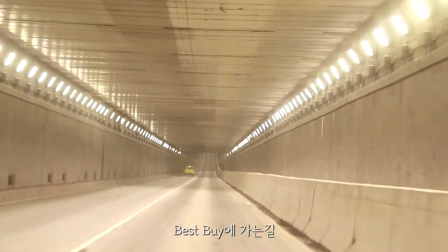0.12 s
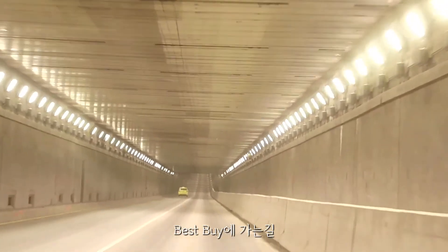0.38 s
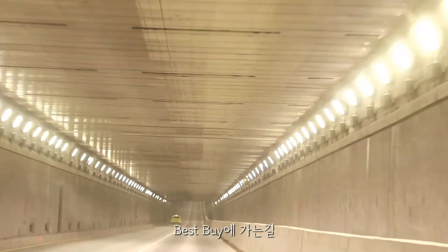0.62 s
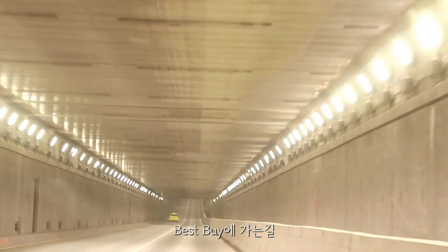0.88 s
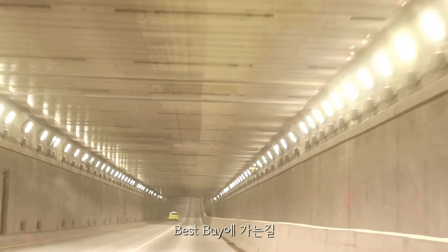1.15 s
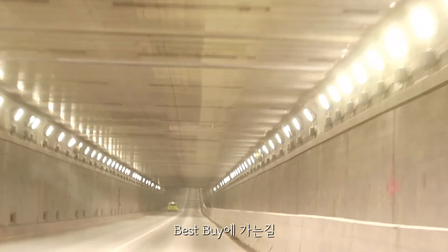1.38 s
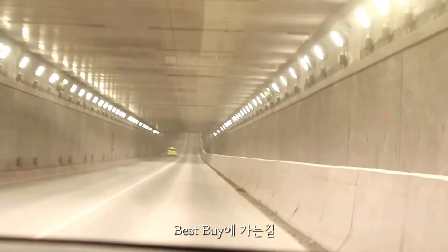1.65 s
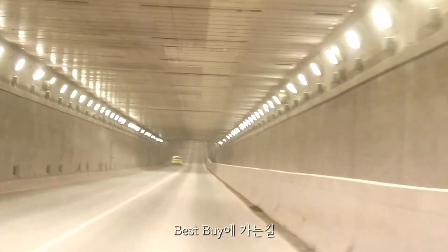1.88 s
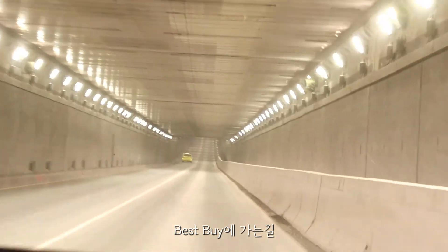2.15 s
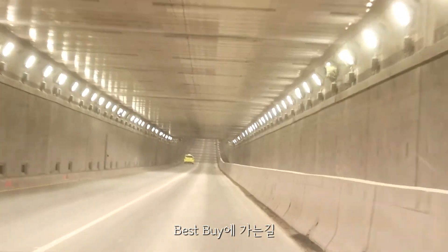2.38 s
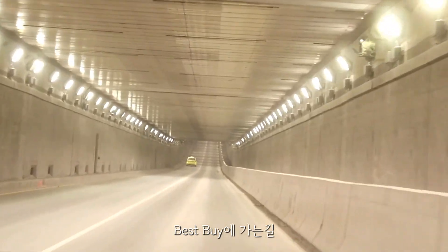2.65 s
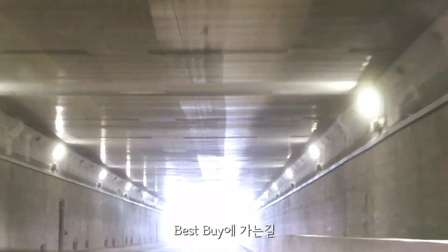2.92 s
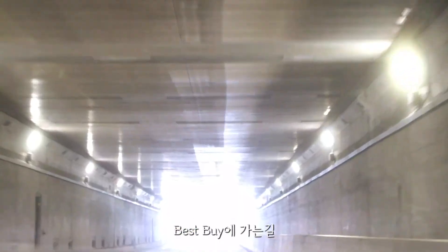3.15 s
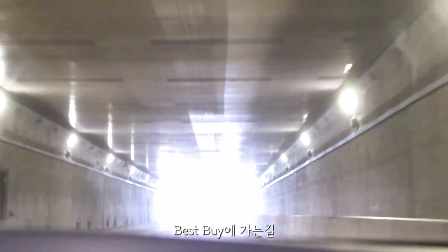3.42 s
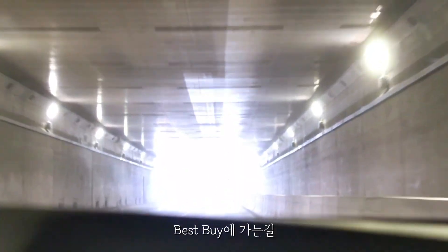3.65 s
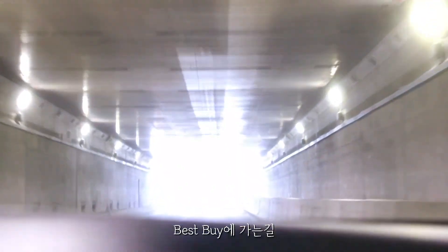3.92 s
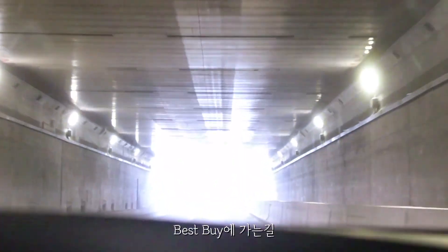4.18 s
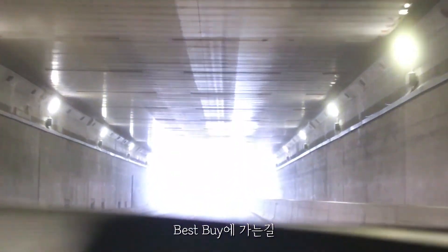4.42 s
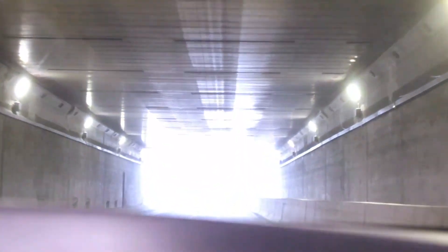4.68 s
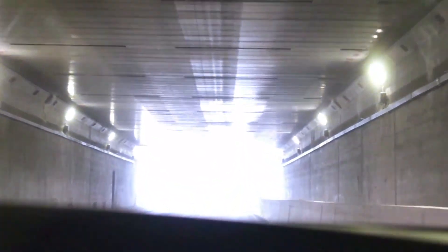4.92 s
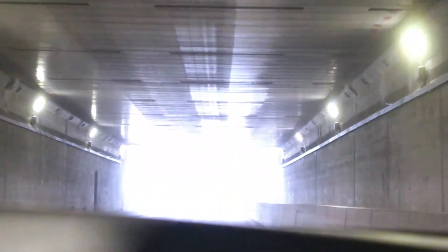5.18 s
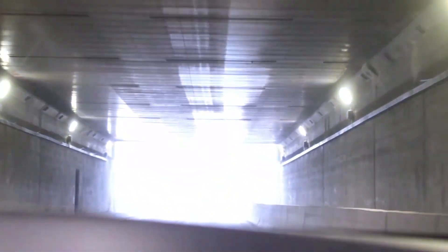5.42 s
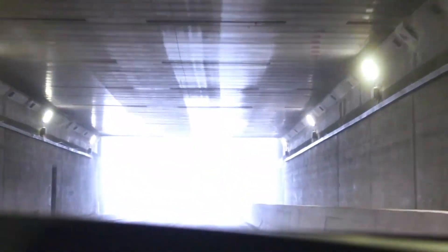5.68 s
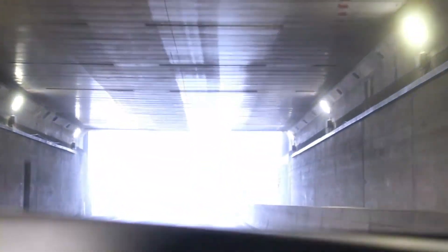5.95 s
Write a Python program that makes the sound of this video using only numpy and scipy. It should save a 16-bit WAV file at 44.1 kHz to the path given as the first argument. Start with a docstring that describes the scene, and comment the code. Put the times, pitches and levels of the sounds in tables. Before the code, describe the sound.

Heard from inside a car cabin in a road tunnel: deep tyre rumble, soft muffled tunnel roar and a faint engine hum. Close to the microphones a hand scuffs plastic, which snaps sharply once. Shortly after, a thin tick marks an abrupt cut to another stretch of road, where the engine's low note booms and slowly sinks in pitch over the rumble, with faint hiss throughout.

```python
"""Tyre rumble and tunnel roar fill a moving car's cabin, with a faint engine note: shaped noise and sines.
Near the close microphone pair a hand rubs plastic (grainy noise) and snaps it once (struck resonances).
At an abrupt edit with a thin tick, a second stretch of tunnel road fades in fast, without the hand.
There the engine's firing note booms in the cabin and its pitch sinks slowly. Faint hiss lies under all."""
import sys
import numpy as np
from scipy import signal
from scipy.io import wavfile
from scipy.ndimage import uniform_filter1d

SR = 44100
rng = np.random.default_rng(int(sys.argv[2]) if len(sys.argv) > 2 else 0)


def boost_factor(decibels):
    """Convert a level in decibels to a linear amplitude factor."""
    exponent = np.asarray(decibels, float) / 20
    return 10 ** exponent


def master_out(mix):
    """Clip the mix to full scale and print it as 16-bit PCM to the path in sys.argv[1]."""
    frames = np.transpose(np.atleast_2d(mix))
    ceiling = np.clip(frames, -1, 1)
    pcm = np.round(ceiling * 32767).astype(np.int16)
    wavfile.write(sys.argv[1], SR, pcm)


N = 267246  # samples
CUT_S = 2.9025  # where the two stretches of road meet


def evened(x):
    """Scales to rms 1."""
    return x / np.sqrt(np.mean(x ** 2) + 1e-20)


def read(points, hz):
    """Reads a spectrum on a log-frequency axis."""
    f, value = np.transpose(points)
    return np.interp(np.log(hz + 1), np.log(f + 1), value)


def follow(points):
    """Reads a level curve at every sample."""
    time, level = np.transpose(points)
    return np.interp(np.arange(N) / SR, time, level)


def bell(hz, centre, width):
    """Profile of one resonance: 1 at its centre, half of that at the edges of its width."""
    return 1 / (1 + ((hz - centre) / (width / 2)) ** 2)


# Stereo image of the close, widened pair: (frequency [Hz], side over mid [dB])
PAIR_WIDTH = [(60, -69.5), (140, -61), (220, -20.5), (500, -19.5), (900, -14.5), (1800, -8.5), (3000, -4),
              (4500, 1.5), (7000, 2), (10500, 5), (12000, -0.5), (14000, -1)]


def noise(colour_db, size, patchy_db, flicker_db, width=PAIR_WIDTH):
    """Mid and side noise from random short-time spectra, with drifting patches; mid has rms 1."""
    hop = size // 4
    hz = np.fft.rfftfreq(size, 1 / SR)
    frames = N // hop + 5
    mid_re, mid_im, side_re, side_im, patches = rng.standard_normal((frames, len(hz), 5)).T
    patches = uniform_filter1d(patches, size=size // 100, axis=0)  # across frequency
    patches = evened(uniform_filter1d(patches, size=4, axis=1))  # across time
    flicker = rng.standard_normal(frames)  # moves the whole spectrum at once
    gain = boost_factor(colour_db(hz)[:, None] + patchy_db * patches + flicker_db * flicker)
    mid = mid_re + 1j * mid_im
    side = (side_re + 1j * side_im) * boost_factor(read(width, hz))[:, None]
    spectra = np.array([mid, side]) * gain
    pair = signal.istft(spectra, nperseg=size, noverlap=size - hop)[1][:, :N]
    return pair / pair[0].std()


# Self-noise of the microphones, lifted by the widening: (frequency [Hz], relative density [dB per Hz])
HISS_COLOUR = [(1500, -20.5), (4000, -1.5), (7000, 0), (10500, -3), (12000, -7.5), (13500, -19.5),
               (16000, -41)]


def hiss():
    """Steady microphone self-noise, placed only in the side channel."""
    level_db = -77.5
    steady = noise(lambda hz: read(HISS_COLOUR, hz), size=1024, patchy_db=0.3, flicker_db=0.0)[0]
    return boost_factor(level_db) * steady * [[0], [1]]


# All around the microphones, the car body on its springs, one table a stretch:
# (frequency [Hz], width [Hz], relative level [dB])
SHUDDER_MODES = [
    [(33.4, 2.4, -7.5), (44.4, 8, -11.5)],
    [(31.6, 6, -7.5), (41.5, 5.5, 2.5)],
]
# Tyres under the floor, one table a stretch: (frequency [Hz], relative density [dB per Hz])
RUMBLE_COLOUR = [
    [(55, -13.5), (66, 0.5), (78, -0.5), (120, 1.5), (160, -7), (185, -6.5), (200, -36.5), (260, -32)],
    [(55, -3.5), (66, -3.5), (78, 0), (120, -3.5), (160, -5.5), (180, -10), (200, -19), (260, -34)],
]
# Tunnel outside the windows, one table a stretch: (frequency [Hz], relative density [dB per Hz])
ROAR_COLOUR = [
    [(150, -16.5), (200, -3.5), (330, -5.5), (480, -9.5), (700, -13.5), (850, -15.5), (950, -18.5),
     (1400, -21.5), (2000, -27.5), (2800, -35.5), (4000, -43.0), (5500, -51.0), (7500, -55.0),
     (10000, -58.5), (13000, -65.5), (15000, -88.5)],
    [(150, -19.5), (200, -5.0), (330, -7.0), (480, -11.5), (700, -10.5), (850, -17), (950, -17.0),
     (1400, -22.5), (2000, -26.5), (2800, -35.0), (4000, -43.0), (5500, -49.5), (7500, -56.5),
     (10000, -58.5), (13000, -60.5), (15000, -87.5)],
]
# Cabin and tyre resonances, one table a stretch: (frequency [Hz], width [Hz], lift [dB])
CABIN_MODES = [
    [(79, 7.6, 3.5), (116, 11, 0.5), (186, 6.7, 5), (340, 37, 1), (595, 36, 3.5), (764, 93, 5.5),
     (856, 20, 6)],
    [(99.6, 17, 3.5), (181.3, 8.7, 4), (343.6, 41, 4.5), (429, 2.8, 5.5), (604, 34, 2.5), (649, 17, 7),
     (694, 30, 2.5), (823, 36, 4), (6320, 360, 5.5)],
]
# Base levels at the pair, one row a stretch: (shudder [dB], rumble [dB], roar [dB])
ROAD_LEVELS = [(-31, -30.5, -38), (-36.5, -34, -43)]
# Coarseness of the road surface, one table a stretch: (time [s], level added to the rumble [dB])
SURFACE = [
    [(0, -1), (.8, 0.5), (1.3, 2), (2.8, -0.9)],
    [(2.9, 1.5), (3.4, 3.5), (3.7, -1.5), (4.5, -1.5), (4.9, 1), (6.06, -0.5)],
]
# How much of that coarseness the roar follows, one a stretch: (share [of the dB])
ROAR_SHARE = [0.22, 0.39]
# Long waves in the road heave the body, or a smooth part calms it:
# (centre time [s], level added to the shudder [dB], half length [s])
HEAVES = [(0.26, 9, .2), (0.832, -2, .2), (1.6, 1.5, 0.28), (4.152, 2.5, .3), (5.621, 6, 0.22)]


def road(k):
    """Body shudder on the springs, plus tyre rumble and tunnel roar that ring in the cabin, for stretch k."""
    def shudder_db(hz):
        bells = sum(boost_factor(db) * bell(hz, f, width) for f, width, db in SHUDDER_MODES[k])
        below = 30 * np.maximum(np.log2(24 / (hz + 1)), 0)
        return 20 * np.log10(bells) - below

    def cabin_db(hz):
        return sum(db * bell(hz, f, width) for f, width, db in CABIN_MODES[k])

    def rumble_db(hz):
        below = 30 * np.maximum(np.log2(55 / (hz + 1)), 0)
        above = 30 * np.maximum(np.log2((hz + 1) / 260), 0)
        return read(RUMBLE_COLOUR[k], hz) + cabin_db(hz) - below - above

    def roar_db(hz):
        return read(ROAR_COLOUR[k], hz) + cabin_db(hz)

    t = np.arange(N) / SR
    body_db, tyres_db, tunnel_db = ROAD_LEVELS[k]
    heave_db = sum(db * np.exp(-((t - s) / half) ** 2) for s, db, half in HEAVES)
    coarse_db = follow(SURFACE[k])
    shudder = noise(shudder_db, size=8192, patchy_db=1.5, flicker_db=1.14)
    rumble = noise(rumble_db, size=8192, patchy_db=0.4, flicker_db=0.2)
    roar = noise(roar_db, size=4096, patchy_db=0.84, flicker_db=0.83)
    shudder = boost_factor(body_db + heave_db) * shudder
    rumble = boost_factor(tyres_db + coarse_db) * rumble
    roar = boost_factor(tunnel_db + ROAR_SHARE[k] * coarse_db) * roar
    return shudder + rumble + roar


# Engine firing note, one row a stretch: (frequency as the stretch starts [Hz], sag [Hz per s])
FIRING_NOTE = [(80.3, 0.796), (70.43, 0.83)]
# Its level in the cabin, one table a stretch: (time [s], level of the fundamental, rms [dB])
BOOM = [
    [(0, -41.5), (2.9, -38.5)],
    [(2.92, -27.5), (3.3, -24), (4.15, -28), (4.95, -24.5), (5.55, -25.5), (6.06, -22)],
]
# Overtones of the firing note: (multiple, level re the fundamental [dB])
OVERTONES = [(2, -24), (3, -31), (5, -36.5)]


def engine(k):
    """A clean firing note with faint overtones, centred; it sags as the car slows."""
    start_hz, sag = FIRING_NOTE[k]
    since_start = np.arange(N) / SR - k * CUT_S
    phase = 2 * np.pi * np.cumsum(start_hz - sag * since_start) / SR
    note = np.sin(phase)
    for multiple, db in OVERTONES:
        note = note + boost_factor(db) * np.sin(multiple * phase + 2 * np.pi * rng.random())
    return np.sqrt(2) * boost_factor(follow(BOOM[k])) * note * [[1], [0]]  # mid only


# Dull slide of skin on plastic: (frequency [Hz], relative density [dB per Hz])
SLIDE_COLOUR = [(1200, -22), (2500, -6), (3500, -3.5), (5200, -2), (6500, -6), (8000, -12), (10500, -10.5),
                (12000, -12), (13500, -23), (15000, -49.5)]
# Bright scuff of skin on plastic: (frequency [Hz], relative density [dB per Hz])
SCUFF_COLOUR = [(1200, -17), (2200, -0.5), (3500, 0.5), (5000, -18), (6500, -6.5), (8500, -5.5),
                (10500, -5), (12000, -15), (13500, -28), (15000, -47.5)]
# Stereo image of sounds right beside the pair: (frequency [Hz], side over mid [dB])
NEAR_WIDTH = [(1500, 4), (5000, 2), (7000, 3), (10000, 5), (13000, 2)]
# Strokes of the hand, brightness running from 0, a dull slide, to 1, a bright scuff:
# (start time [s], peak level [dB], rise [s], t60 after the peak [s], brightness [0 to 1])
STROKES = [(1.725, -68, .012, .3, .5), (1.890, -50, .004, 0.076, 0.86), (2.107, -53.5, .018, 0.53, .1),
           (2.18, -58.5, .06, .15, .3)]


def rubbing():
    """Skin moving over plastic: a grainy hiss between a dull slide and a bright scuff."""
    t = np.arange(N) / SR
    # the hand rests on the plastic and creeps
    creep_from_s, creep_to_s, ease_s = 1.58, 2.43, 0.18
    creep_db, creep_bright = -69, 0.6
    creep = boost_factor(creep_db) * np.clip(np.minimum(t - creep_from_s, creep_to_s - t) / ease_s, 0, 1)
    touches = [(creep, creep_bright)]
    for start, peak_db, rise, t60, bright in STROKES:
        swell = np.clip((t - start) / rise, 0, 1)
        fade_db = 60 * np.maximum(t - start - rise, 0) / t60
        touches.append((swell * boost_factor(peak_db - fade_db), bright))
    slide = noise(lambda hz: read(SLIDE_COLOUR, hz), size=256, patchy_db=2.0, flicker_db=3.5, width=NEAR_WIDTH)
    scuff = noise(lambda hz: read(SCUFF_COLOUR, hz), size=256, patchy_db=2.5, flicker_db=4.0, width=NEAR_WIDTH)
    # brightness shares out the power of each touch
    dull = np.sqrt(sum(shape ** 2 * (1 - bright) for shape, bright in touches))
    sharp = np.sqrt(sum(shape ** 2 * bright for shape, bright in touches))
    return dull * slide + sharp * scuff


# Snaps of the plastic beside the pair: (time [s], energy [dB], left over right [dB])
SNAPS = [(2.248, -4.5, -3.5)]
# Modes of the small plastic part: (frequency [Hz], relative level [dB], t60 [s])
PLASTIC_MODES = [(1450, 0.5, 0.018), (1780, 0.5, .007), (2395, 5.5, 0.0067), (3430, -1, 0.0047),
                 (4100, -6, 0.0027), (5000, 0, 0.0037), (6460, -0.5, 0.0033), (7500, 2, 0.0043),
                 (8800, -22, 0.0023), (10200, -10, .003), (12400, -11, 0.0018)]


def snaps():
    """Quick slips ring the plastic, dash and glass scatter them back; each microphone gets its own mix."""
    mic_edge_hz, low_edge_hz = 12500, 1100
    t = np.arange(1500) / SR
    out = np.zeros((2, N))
    ring = sum(boost_factor(db - 60 * t / t60) * np.sin(2 * np.pi * hz * t) for hz, db, t60 in PLASTIC_MODES)
    # the microphones roll off at the top
    ring = np.convolve(ring, signal.firwin(63, mic_edge_hz, fs=SR))
    # the small part radiates nothing deeper
    ring = signal.sosfilt(signal.butter(4, low_edge_hz, 'high', fs=SR, output='sos'), ring)
    for time, energy_db, pan_db in SNAPS:
        shared, left, right = rng.standard_normal((3, len(t)))
        slips = boost_factor(-60 * t / 0.0019) + boost_factor(-18 - 60 * t / 0.03)  # sharp slip, then faint scatter
        strikes = slips * (0.6 * shared + np.array([left, right]))
        sound = signal.fftconvolve(strikes, ring[None], axes=1)
        sound /= np.linalg.norm(sound, axis=1, keepdims=True)  # energy 1 in each channel
        sound *= boost_factor(energy_db + np.array([[pan_db / 2], [-pan_db / 2]]))
        at = round(time * SR)
        out[:, at:at + sound.shape[1]] += sound
    return out


def scene():
    """The first stretch stops short, the second fades in fast; mid and side become left and right."""
    fade_out_s, fade_in_s, tick_db = 0.001, 0.012, -41
    t = np.arange(N) / SR
    first = np.clip((CUT_S - t) / fade_out_s, 0, 1)
    second = np.clip((t - CUT_S) / fade_in_s, 0, 1)
    before = road(0) + engine(0) + rubbing()
    after = road(1) + engine(1)
    mid, side = first * before + second * after + hiss()
    mid[round(CUT_S * SR)] += boost_factor(tick_db)  # the edit leaves a thin tick
    return np.array([mid + side, mid - side]) + snaps()


def roll_off(x):
    """The treble ends steeply here."""
    return signal.sosfilt(signal.butter(12, 14800, fs=SR, output="sos"), x)


def record(dry):
    """Delivers the finished mix."""
    return roll_off(dry)


dry = scene()
out = record(dry)
master_out(out)
```